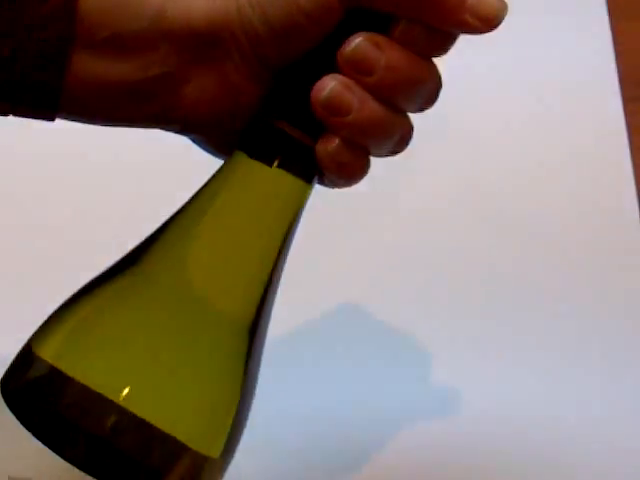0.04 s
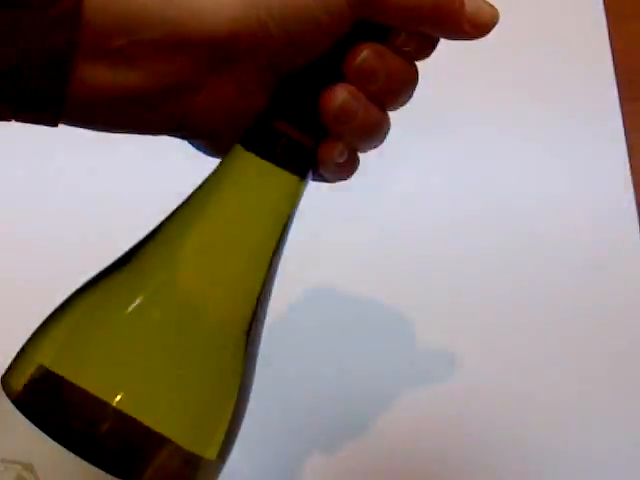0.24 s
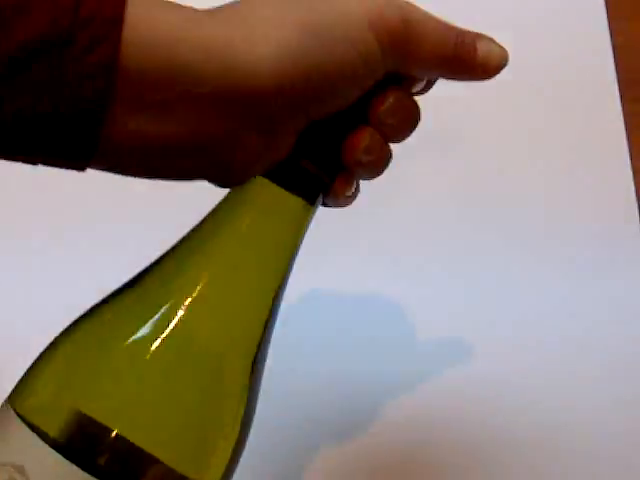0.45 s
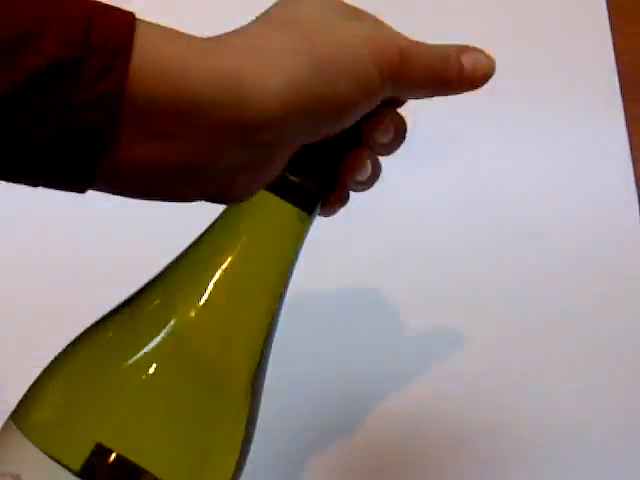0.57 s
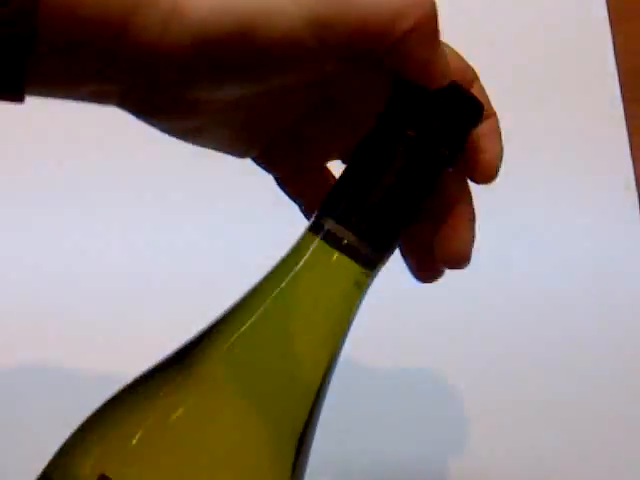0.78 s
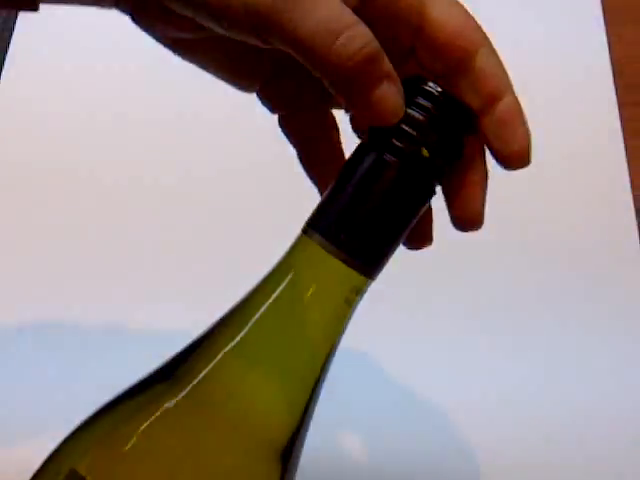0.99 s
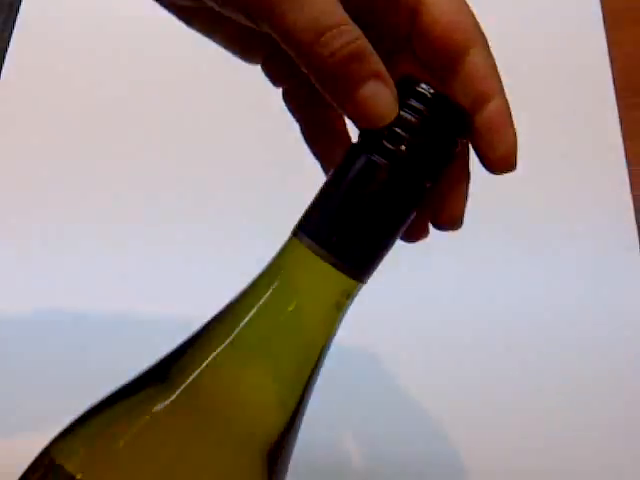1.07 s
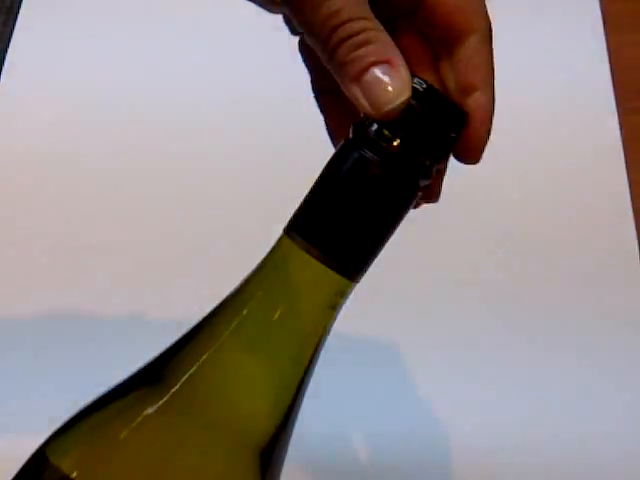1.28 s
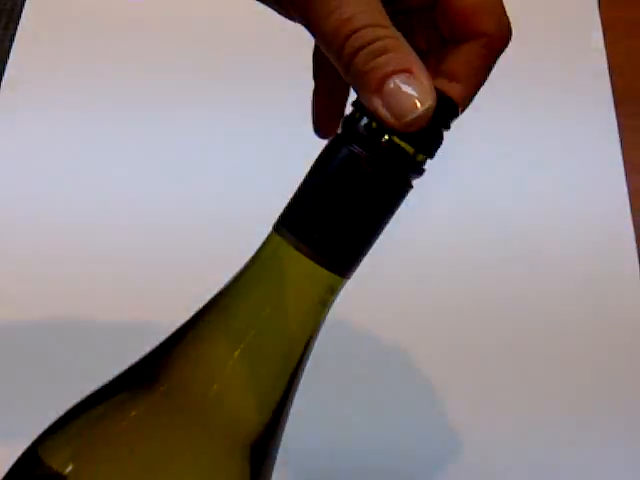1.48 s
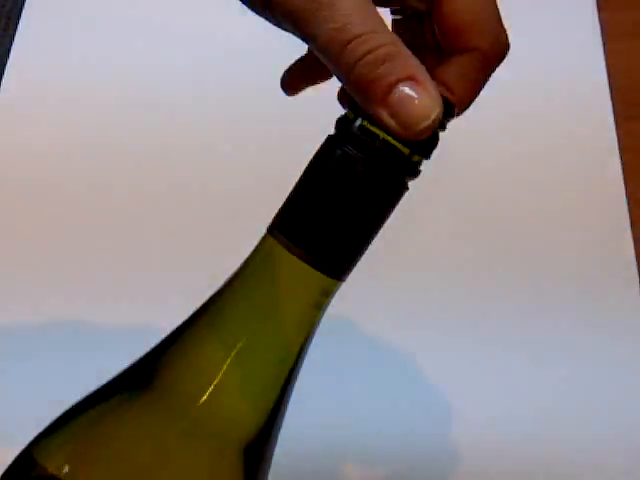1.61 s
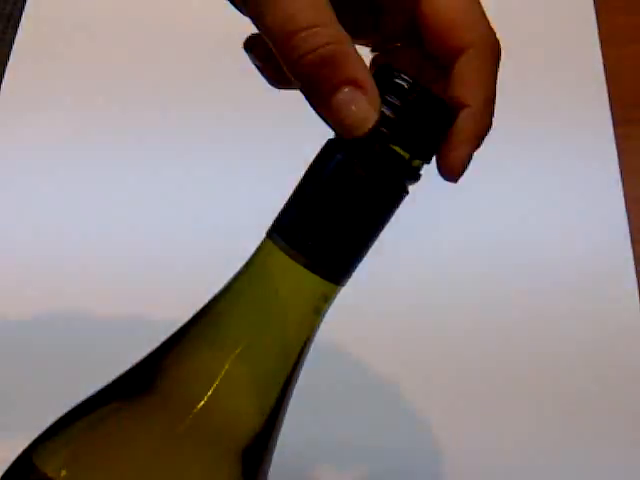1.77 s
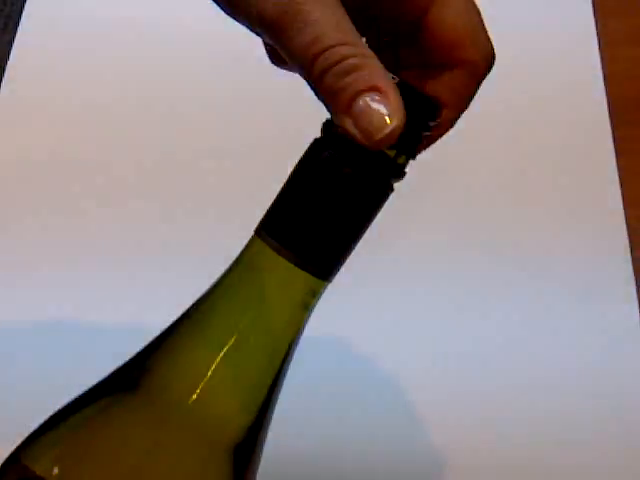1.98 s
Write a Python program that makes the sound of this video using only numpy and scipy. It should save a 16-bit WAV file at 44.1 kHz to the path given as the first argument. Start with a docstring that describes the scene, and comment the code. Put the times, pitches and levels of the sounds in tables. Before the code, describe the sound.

A metal screw cap cracks open on a glass bottle. Four sharp, quick snaps come at about 0.2 to 0.3 seconds, one at 0.45 and three more near 0.55, each ringing briefly in a small room. The loose cap gives two tiny ticks around 0.85 seconds. From 1.4 to 2.1 it rubs very faintly on its thread, with another tick and a finger slide, over quiet hiss.

```python
"""Opening a screw-cap bottle

A hand twists the metal cap of a glass bottle: the seal's bridges snap one by one, in three bursts.
Each snap rings the hand-damped cap for milliseconds and the glass longer; a small room answers.
Then the loose cap ticks and rubs faintly on its thread, over quiet room noise and microphone hiss."""
import sys
import numpy as np
from scipy import signal
from scipy.fft import rfft, irfft, next_fast_len
from scipy.io import wavfile
from scipy.ndimage import map_coordinates

SR = 44100
rng = np.random.default_rng(int(sys.argv[2]) if len(sys.argv) > 2 else 0)


def master_out(mix):
    """Clip the mix to full scale and print it as 16-bit PCM to the path in sys.argv[1]."""
    frames = np.transpose(np.atleast_2d(mix))
    ceiling = np.clip(frames, -1, 1)
    pcm = np.round(ceiling * 32767).astype(np.int16)
    wavfile.write(sys.argv[1], SR, pcm)


N = 90404


def amp(db):
    """Decibels to gain."""
    return 10 ** (np.asarray(db) / 20)


def unit(x):
    """Scale to rms 1."""
    return x / np.sqrt(np.mean(x ** 2) + 1e-20)


def along(points, hz):
    """Interpolate (Hz, value) points on a log axis."""
    f, v = np.transpose(points)
    return np.interp(np.log(hz + 1), np.log(f + 1), v)


def filtered(x, response):
    """Zero-phase filter with gain response(hz)."""
    m = next_fast_len(N + SR // 2)
    return irfft(rfft(x, m) * response(np.fft.rfftfreq(m, 1 / SR)), m)[:N]


def noise(colour):
    """Noise of rms 1, shaped by (Hz, dB) points."""
    return unit(filtered(rng.standard_normal(N), lambda hz: amp(along(colour, hz))))


def wobble(knots_per_s):
    """Smooth random curve."""
    knots = rng.standard_normal(int(N * knots_per_s / SR) + 4)
    return map_coordinates(knots, [np.arange(N) * knots_per_s / SR])


def click(colour, size=1024):
    """Minimum-phase pulse, shaped by (Hz, dB) points."""
    cepstrum = irfft(np.log(amp(along(colour, np.fft.rfftfreq(size, 1 / SR)))))
    cepstrum[1:size // 2] *= 2
    cepstrum[size // 2 + 1:] = 0
    return irfft(np.exp(rfft(cepstrum)))


def fade(t, t60_s):
    """Exponential decay."""
    return np.exp(-np.log(1000) * t / t60_s)


def ring(t, hz, t60_s, rise_s=0.00018):
    """One mode, swelling quickly as the metal gives way."""
    return np.cos(2 * np.pi * hz * t) * fade(t, t60_s) * (1 - np.exp(-t / rise_s))


def swell(start_s, length_s):
    """Half-sine envelope."""
    return np.sin(np.pi * np.clip((np.arange(N) / SR - start_s) / length_s, 0, 1))


def add(track, start_s, sound):
    """Mix a sound into the track."""
    part = track[round(start_s * SR):][:len(sound)]
    part += sound[:len(part)]


def room_noise():
    """Low rumble, drifting slightly in level."""
    # Each row: frequency in Hz, relative level in dB.
    colour = [(25, -28), (42, -19), (65, -3), (120, -8), (210, 1), (320, 0), (550, -5), (1000, -11),
              (2200, -17.5), (6000, -68.5)]
    # Each row: time in seconds, level in dB.
    levels = [(0, -65.5), (0.499, -65.5), (1.1, -64.5), (1.5, -66.5), (1.8, -64), (2.05, -64)]
    level_db = np.interp(np.arange(N) / SR, *np.transpose(levels))
    return amp(level_db) * noise(colour)


def microphone_hiss(hiss_db=-60, band_db=-72, centre_hz=5840, swing_hz=412):
    """Steady hiss with one narrow, wandering band."""
    # Each row: frequency in Hz, relative level in dB.
    colour = [(200, 4), (2000, -2.5), (4000, -2.5), (5300, -0.5), (6300, -1.5), (7000, -2.5), (8000, -5.5),
              (9200, -3.5)]
    phase = 2 * np.pi * np.cumsum(centre_hz + swing_hz * wobble(55)) / SR
    band = unit(wobble(700) * np.sin(phase) + wobble(700) * np.cos(phase))
    return amp(hiss_db) * noise(colour) + amp(band_db) * band


def snap(t, tilt_db_per_oct=0, pivot_hz=3000, tear_db=-21.5, tear_t60_s=0.019):
    """One sharp release, then a short burst as the metal goes on tearing."""
    # Each row: frequency in Hz, level in dB before the tilt.
    colour = [(60, -34), (450, -22), (900, -13), (1600, 4.4), (2300, 2.4), (3200, 5.5), (4200, 3.2),
              (5500, 8), (7000, 0), (12000, -13.5)]
    force = amp(tear_db) * rng.standard_normal(len(t)) * fade(t, tear_t60_s)
    force[0] = 1
    tilted = [(hz, db + tilt_db_per_oct * np.log2(hz / pivot_hz)) for hz, db in colour]
    return signal.fftconvolve(force, click(tilted))[:len(t)]


def cap_ring(t, drive_db):
    """Hand-damped cap modes, driven in four groups from low to top."""
    # Each row: frequency in Hz, relative level in dB, T60 in seconds, group (rounded to 0-3).
    modes = [(1673, -8, 0.013, 0), (1816, -1, 0.015, 0.5), (3255, -4.5, 0.01, 1), (3335, -4.5, 0.016, 1),
             (5450, -2, 0.0093, 2), (5940, -2, 0.007, 2), (6557, -1.5, 0.013, 3), (7220, -6.5, 0.0085, 3)]
    return sum(amp(db + drive_db[round(group)]) * ring(t, hz, t60_s) for hz, db, t60_s, group in modes)


def bottle_knock(t, level_db, rise_s=0.003):
    """Dull knock of the hand-held bottle."""
    # Each row: frequency in Hz, relative level in dB, T60 in seconds.
    modes = [(313, -2, 0.055), (500, -9, 0.027), (715, -5, .06), (940, -9.5, 0.013)]
    body = sum(amp(db + level_db) * ring(t, hz, t60_s) for hz, db, t60_s in modes)
    return body * (1 - np.exp(-t / rise_s))


def glass_ring(t, gain_db=-52, scatter_db=1.5):
    """Faint glass modes, their balance random at each strike."""
    # Each row: frequency in Hz, relative level in dB, T60 in seconds.
    modes = [(1720, 4, 0.25), (2050, 11.5, 0.14), (2500, 2, 0.12), (3270, 9.5, 0.11), (3780, 1.5, 0.18),
             (5030, 0, 0.42), (5350, 6, .16), (5540, -15, 0.083), (6540, 4, 0.11)]
    glass = sum(amp(db + rng.normal(0, scatter_db)) * ring(t, hz, t60_s) for hz, db, t60_s in modes)
    return amp(gain_db) * glass


def room_tail(t):
    """Diffuse reverberation: noise dying away band by band."""
    # Each row: frequency in Hz, T60 in seconds.
    decay = [(300, 0.7), (900, 0.28), (2100, 0.26), (3400, 0.31), (5500, 0.2), (8000, 0.12)]
    # Each row: frequency in Hz, gain in dB.
    colour = [(60, -36), (280, -15.5), (600, -11.5), (1200, -6.5), (1700, -0.5), (2300, 1.5), (3300, -2),
              (4200, -2), (5500, 1.5), (7000, -0.5), (9000, -4.5)]
    hz, frame_s, bands = signal.stft(rng.standard_normal(len(t)), SR, nperseg=256)
    bands = bands * fade(frame_s, along(decay, hz)[:, None])
    plain = signal.istft(bands, SR, nperseg=256)[1]
    coloured = signal.istft(bands * amp(along(colour, hz))[:, None], SR, nperseg=256)[1]
    return coloured[:len(t)] / np.linalg.norm(plain)


def in_room(x, tail_db, tail_delay_s=0.002):
    """Add near reflections to a strike, plus room tail and glass ring scaled by tail_db."""
    # Each row: delay in seconds, gain in dB.
    walls = [(.0043, -27.5), (.0083, -24), (0.0093, -21), (0.0112, -24.5)]
    out, t = x.copy(), np.arange(len(x)) / SR
    for delay_s, db in walls:
        add(out, delay_s, amp(db) * x)
    add(out, tail_delay_s, amp(tail_db) * (room_tail(t) + glass_ring(t)))
    return out


def seal_breaks():
    """Each bridge breaks at another place on the rim, so drives cap and room differently."""
    # Each row: start in seconds, snap level in dB, tilt in dB per octave, drive of the low, middle,
    # high and top cap modes in dB, knock level in dB, tail level in dB.
    bridges = [(0.2277, -3, 4.5, -28.5, -31, -15, -23, -62, -9),
               (0.24403, -3.5, -2.3, -36, -43, -33, -35, -54, -6.5),
               (0.25555, -3.5, -2.5, -22, -51, -18, -50, -53.5, -8),
               (0.2906, -11.1, -1.1, -40.5, -30, -31, -57, -71, -19.5),
               (0.4393, -6, -1, -22.5, -42, -31.5, -16, -59, -6.5),
               (0.5404, -11.5, 6.5, -38.5, -22, -42.5, -33.5, -57.5, -10.5),
               (0.5712, -16.5, 5, -41, -24, -23, -24.3, -56, -5.5),
               (0.5783, -3.6, 0.8, -60, -24.5, -43, -30, -37.5, -6.5)]
    out, t = np.zeros(N), np.arange(SR // 3) / SR
    for start_s, snap_db, tilt_db_per_oct, *drive_db, knock_db, tail_db in bridges:
        release = amp(snap_db) * snap(t, tilt_db_per_oct)
        crack = release + cap_ring(t, drive_db) + bottle_knock(t, knock_db)
        add(out, start_s, in_room(crack, tail_db))
    return out


def cap_ticks():
    """The loose cap ticks: tiny snaps."""
    # Each row: start in seconds, level in dB.
    ticks = [(0.8348, -36), (0.862, -35), (1.585, -43)]
    out, t = np.zeros(N), np.arange(SR // 3) / SR
    for start_s, db in ticks:
        add(out, start_s, in_room(amp(db) * snap(t), db))
    return out


def thread_rub():
    """The cap rubs on its thread: resonant noise with a slight flutter."""
    # Each row: start in seconds, length in seconds, level in dB.
    rubs = [(1.4, 0.31, -70), (1.798, 0.028, -73), (1.988, .09, -64)]
    # Each row: frequency in Hz, relative level in dB.
    colour = [(1500, -24), (2450, -8), (2700, 12), (2950, -16), (3200, -17), (3450, 5), (3750, -22),
              (8000, -39)]
    pressure = sum(amp(db) * np.sqrt(np.abs(swell(start_s, length_s))) for start_s, length_s, db in rubs)
    return pressure * noise(colour) * amp(wobble(40.6))


def grip_bump(start_s=1.73, length_s=0.16, hz=219.9, level_db=-60.5):
    """Soft low bump as the grip shifts."""
    tone = np.sin(2 * np.pi * hz * np.arange(N) / SR)
    return amp(level_db) * swell(start_s, length_s) ** 2 * tone


def finger_slide(start_s=1.885, length_s=0.074, level_db=-61):
    """A fingertip slides over the knurling."""
    # Each row: frequency in Hz, relative level in dB.
    colour = [(3000, -15), (4700, -8), (5150, 2), (6100, 1), (6700, -12), (9000, -42)]
    return amp(level_db) * swell(start_s, length_s) * noise(colour)


def scene():
    """Mono mix of bottle, hand and background."""
    opening = seal_breaks() + cap_ticks() + finger_slide() + thread_rub() + grip_bump()
    return (opening + room_noise() + microphone_hiss())[None]


def record(dry):
    """The microphone thins the deep bass and the treble, then cuts off steeply."""
    # Each row: frequency in Hz, gain in dB.
    roll_off = [(7000, -1), (7600, -6.5), (8000, -10), (8700, -22), (9200, -35)]
    low_cut_hz, top_hz = 119, 9050
    thin = signal.sosfilt(signal.butter(2, low_cut_hz, "highpass", fs=SR, output="sos"), dry[0])
    dull = filtered(thin, lambda hz: amp(along(roll_off, hz)))
    return filtered(dull, lambda hz: 1 / np.sqrt(1 + (hz / top_hz) ** 200))[None]


dry = scene()
out = record(dry)
master_out(out)
```